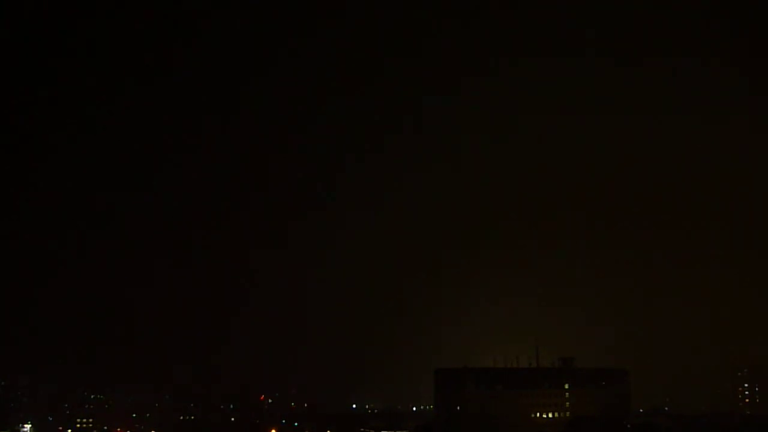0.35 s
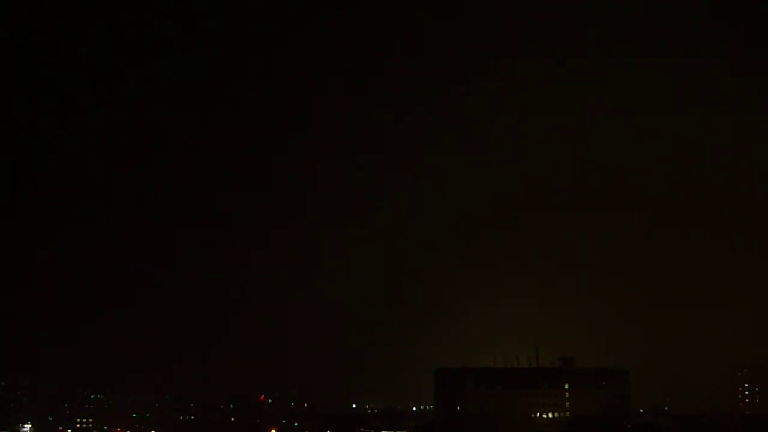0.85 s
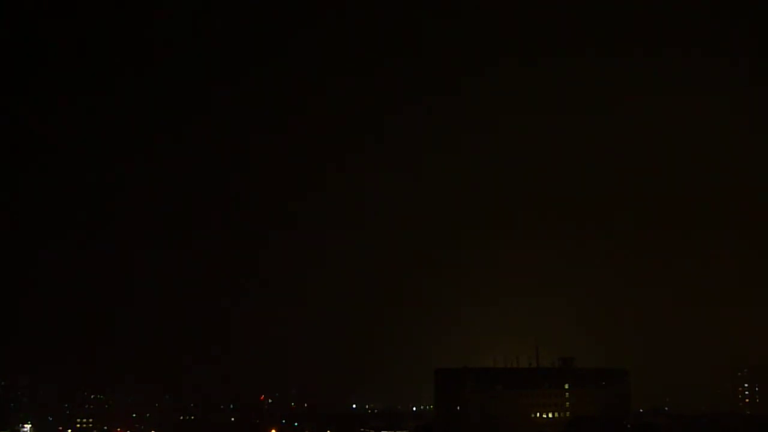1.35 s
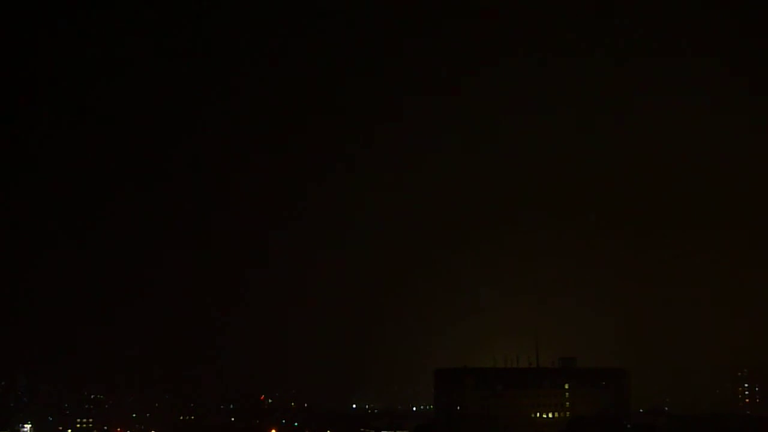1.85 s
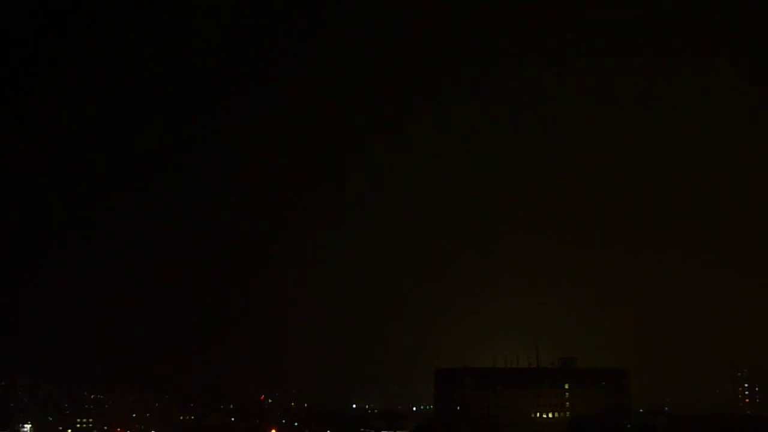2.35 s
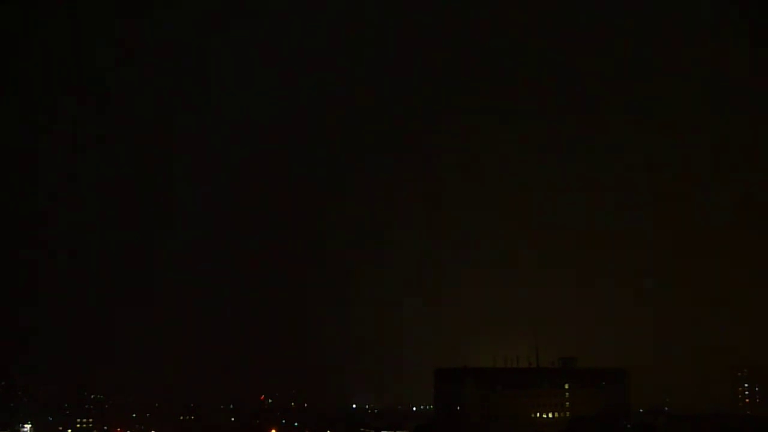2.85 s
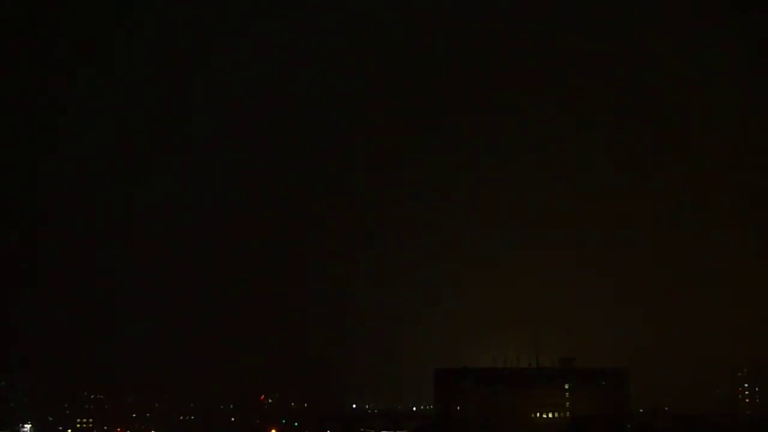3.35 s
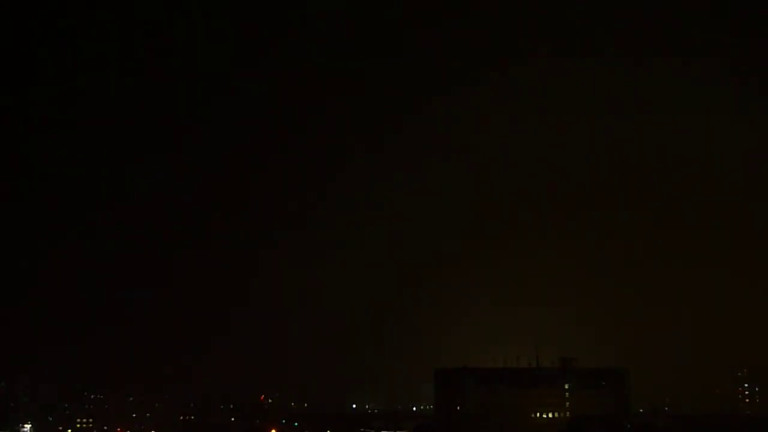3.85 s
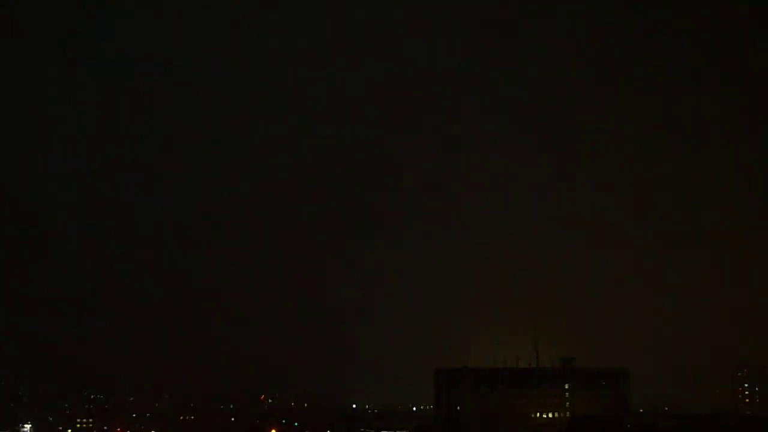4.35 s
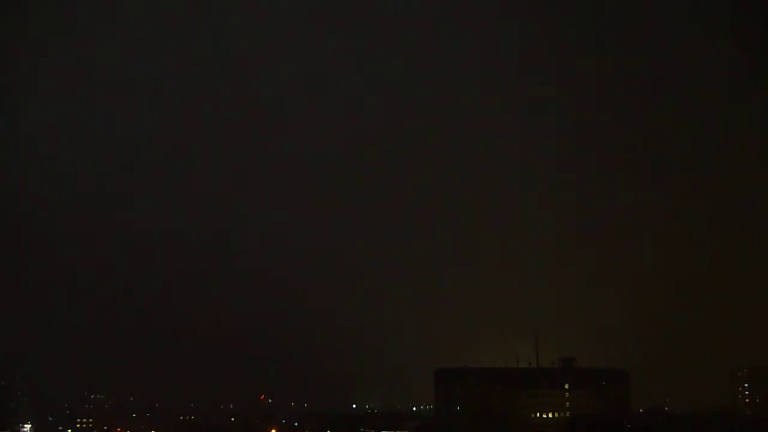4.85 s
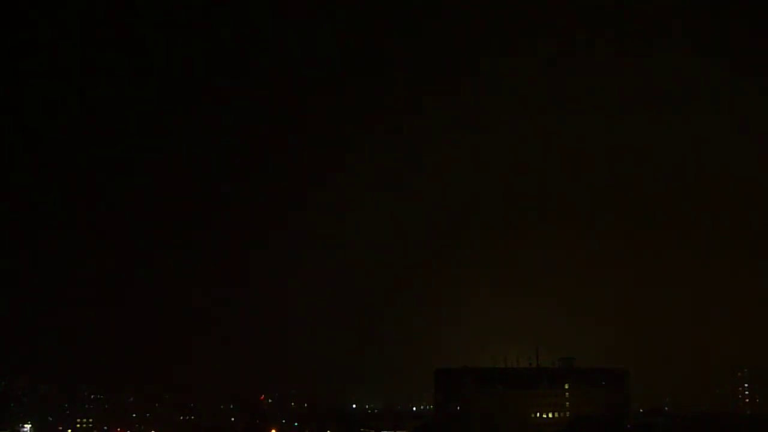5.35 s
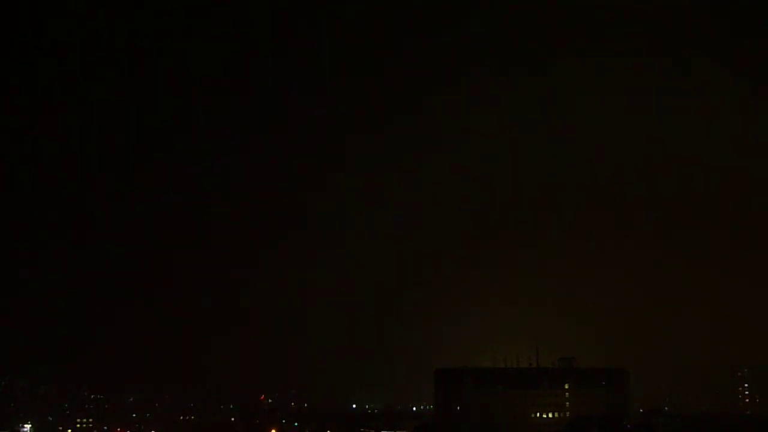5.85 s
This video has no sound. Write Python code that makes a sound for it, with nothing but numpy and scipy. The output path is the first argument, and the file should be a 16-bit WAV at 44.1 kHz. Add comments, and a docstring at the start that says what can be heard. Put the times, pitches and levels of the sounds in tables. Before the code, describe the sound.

Outdoors over a city at night, heard from a window by a small camera. Low thunder is already rolling at the start and never stops, surging and booming between walls with short, thudding claps. Steady, patchy rain hisses behind it, dipping quickly and swelling back. From half a second, close drops tap the sill. The sound is dull, slightly flattened at peaks, with faint hiss.

```python
"""Distant thunder rolls over a city at night in steady rain, heard by a small camera at a window.
From the start, scattered shocks rumble and boom between the walls, over deep city rumble and far raindrops.
The rain sinks quickly at set moments and swells back. After half a second the first close drops
tap the sill; soon after, single claps, each a sagging ring with a bright crack, stand out of the roll.
Throughout, the camera flattens the peaks, cuts the treble and adds faint hiss and whine."""
import sys
import numpy as np
from scipy import signal
from scipy.io import wavfile
from scipy.ndimage import uniform_filter1d

SR = 44100
rng = np.random.default_rng(int(sys.argv[2]) if len(sys.argv) > 2 else 0)


def how_loud(loudness_db):
    """Turn decibels into a plain amplitude multiplier (0 dB gives 1, 20 dB gives 10)."""
    steps = np.asarray(loudness_db, float) / 20
    return 10 ** steps


def dump_mix(stems):
    """Bounce the given channels to the path in sys.argv[1] as a 16-bit WAV at rate SR."""
    frames = np.atleast_2d(stems).T  # one column per channel
    limited = np.clip(frames, -1, 1)  # hard clip at full scale
    pcm = np.round(limited * 32767).astype(np.int16)
    wavfile.write(sys.argv[1], SR, pcm)


N = 262836  # length in samples

# Ringing tones of the sill. Each row: pitch in Hz (before detuning), relative level in dB (before tilt),
# time to fall by 60 dB in seconds.
SILL = [(1286, 1.5, 0.017), (1814, -2, 0.017), (2930, -5, 0.011), (3700, -7.5, .012), (4560, -14, 0.011)]
FAR_HZ = 260  # middle of the far thunder, where the brightness tilt pivots


def evened(x):
    """Scales a sound to an rms level of 1."""
    return x / np.sqrt(np.mean(x ** 2) + 1e-20)


def read(points, hz):
    """Reads a spectrum between its points, on a log-frequency axis."""
    point_hz, value = np.transpose(points)
    return np.interp(np.log(hz + 1), np.log(point_hz + 1), value)


def played(rows, column):
    """Turns a dB column of a table into gain over time; the first column is in seconds."""
    rows = np.array(rows)
    db = np.interp(np.arange(N) / SR, rows[:, 0], rows[:, column])
    return how_loud(db)


def add(mix, start_s, sound):
    """Mixes a sound in at a start time, cut off at the end of the mix."""
    part = mix[round(start_s * SR):][:len(sound)]
    part += sound[:len(part)]


def coloured(x, points, size=8192):
    """Filters a sound to a spectrum with no ringing ahead of it (minimum phase)."""
    hz = abs(np.fft.fftfreq(size, 1 / SR))
    log_gain = np.log(how_loud(np.maximum(read(points, hz), -100)))
    # The Hilbert transform finds the phase that puts the energy as early as possible.
    spectrum = np.exp(np.conj(signal.hilbert(log_gain)))
    taps = np.fft.ifft(spectrum).real[:size // 2]
    return signal.oaconvolve(x, taps)[:N]


def scattered(per_s, spread_db):
    """Makes random clicks of either sign; a few are large."""
    chance, size, sign = rng.random((3, N))
    happens = chance < per_s / SR
    height = how_loud(spread_db * np.minimum(-np.log(size + 1e-9), 5))
    return happens * np.sign(sign - .5) * height


def steadied(x, seconds, share):
    """Evens out a share (0 to 1) of the slow chance swell, so that the roll keeps to its course."""
    width = int(seconds * SR)
    power = uniform_filter1d(uniform_filter1d(x ** 2, width), width)
    level = np.sqrt(abs(power) + 1e-9)
    return evened(x / level ** share)


def surge(hz):
    """Gives the gain over time of short surges and lulls for a part of the roll centred on hz."""
    # Each row: middle in seconds, change in dB at its strongest, centre in Hz, width in octaves,
    # half length in seconds.
    surges = [(0.06, 11, 111, 0.35, 0.14), (0.353, -3, 165, 0.27, 0.022), (0.332, 7, 390, 0.26, 0.02),
              (0.447, 4, 150, 0.94, 0.039), (0.896, -5, 200, .8, 0.035), (1.236, 11, 112, 0.27, .04),
              (1.23, 7, 282, .4, .03), (1.288, -7, 180, .6, 0.034), (1.416, -1.5, 157, 0.28, 0.092),
              (1.514, 1.5, 112, .3, 0.058), (1.526, 4, 310, 0.61, 0.061), (1.658, 7.5, 202, 1.4, 0.027),
              (1.884, -2, 111, 0.33, 0.031), (2.092, 4, 260, 0.41, 0.084), (2.15, 12, 141, 0.48, 0.038),
              (2.423, 4, 112, 0.36, .04), (2.506, 4, 310, .5, .04), (2.554, 13, 112, 0.35, 0.067),
              (2.643, -6, 130, .5, 0.062), (2.74, 3, 200, 1.8, 0.094), (2.954, 0.5, 157, .3, .05),
              (3.25, 9, 130, .4, 0.058), (3.344, 1, 140, .4, .04), (3.388, -5, 200, 1.3, 0.028),
              (3.432, 6, 170, 0.37, .04), (3.496, -7, 230, 0.7, 0.032), (3.879, 7.5, 326, 0.39, 0.029),
              (3.91, 13, 129, .4, .04), (4.02, -6, 120, .4, .06), (4.2, 12, 112, 0.2, 0.064),
              (4.303, 4, 257, 0.24, 0.043), (4.55, -4.5, 150, 0.91, 0.051), (4.832, 6, 126, 0.45, .06),
              (4.945, 9.5, 112, .3, 0.033), (4.984, 7, 390, 0.28, 0.021), (5.051, 4, 262, 0.35, 0.019),
              (5.072, -13, 171, 1.3, 0.022), (5.206, -2.5, 200, 1.1, 0.084), (5.277, 11, 112, 0.22, .04),
              (5.45, 1, 112, 0.19, .05), (5.605, 5, 135, .4, 0.024), (5.61, 3, 392, .3, 0.028),
              (5.704, 5, 135, .5, 0.026), (5.923, 13, 170, 0.89, 0.035)]
    t = np.arange(0, N + 64, 64) / SR  # every 64 samples is fine enough
    db = np.zeros(len(t))
    for middle_s, change_db, mid_hz, octaves, half_s in surges:
        nearness = np.exp(-(np.log2(hz / mid_hz) / octaves) ** 2)
        db += change_db * nearness * np.maximum(1 - abs(t - middle_s) / half_s, 0)
    return how_loud(np.interp(np.arange(N) / SR, t, db))


def course(hz, db):
    """Gives the gain over time of a part of the roll: common level, tilted by brightness, with surges."""
    # Each row: time in seconds, common level in dB (before tilt, trim and surges),
    # brightness in dB per octave.
    roll = [(0.0, -28, 2.5), (0.85, -23.5, -0.5), (0.88, -29.5, 0), (1.48, -26, 2.5), (1.49, -23, -2),
            (2.47, -28, 0), (2.49, -25.5, 2), (2.77, -24.5, -1), (3.54, -27, 1), (3.88, -23, 2.5),
            (3.92, -28, 2.5), (4.3, -22.5, 2.5), (4.53, -28, -1), (4.86, -25, -1), (4.98, -22, 2.5),
            (5.13, -30.5, -1), (5.64, -26.5, -2.5), (5.88, -28, -4), (5.91, -26, 0), (5.96, -35.5, 7)]
    tilt = played(roll, column=2) ** np.log2(hz / FAR_HZ)
    return how_loud(db) * played(roll, column=1) * tilt * surge(hz)


def thunder():
    """Shocks from many bends of the channel arrive scattered, far ones dull; deep city rumble lies below."""
    # Spectra of the parts. Each row: frequency in Hz, relative level in dB per Hz.
    rumble_spectrum = [(50, -31), (80, -11), (95, -6.5), (115, 5.5), (135, -5), (170, -24.5), (300, -58.5)]
    boom_spectrum = [(80, -42.5), (125, -19), (145, -7.5), (157, -0.5), (168, -6), (195, -13), (300, -66.5)]  # lowest ring between the walls
    far_spectrum = [(120, -46), (180, -0.5), (210, -2.5), (250, 4), (280, 1.5), (301, 5), (330, -10.5),
                    (450, -53)]
    near_spectrum = [(220, -31), (320, -6.5), (368, 2), (400, -2), (500, -6.5), (700, -14), (900, -22.5),
                     (1400, -54)]
    deep_spectrum = [(12, -24), (25, -9), (35, -4), (60, -2), (75, 4.5), (90, -5), (130, -38)]  # deep rumble of the city, rising and falling in level
    # Levels of the ring and the city rumble. Each row: time in seconds, level in dB (the ring's before
    # trim and surges).
    boom_level = [(0.0, -25.5), (0.31, -32.5), (0.33, -23), (1.14, -23.5), (1.16, -27), (1.44, -19),
                  (1.48, -27.5), (1.59, -27.5), (2.95, -25), (2.99, -29.5), (4.37, -24.5), (4.75, -31),
                  (4.8, -28), (5.28, -31), (5.31, -21.5), (5.64, -29), (5.68, -23), (5.96, -27.5)]
    deep_level = [(0.0, -44), (0.06, -49), (0.76, -54), (0.78, -41.5), (0.93, -59), (1.59, -43.5),
                  (1.81, -51.5), (3.9, -52), (4.21, -41), (4.68, -52), (4.98, -38), (5.04, -49),
                  (5.51, -46), (5.58, -36.5), (5.86, -47), (5.96, -40)]

    shocks = scattered(1500., 1.74)  # the far and near parts share these
    rumble = coloured(scattered(1500., 0.91), rumble_spectrum)
    rumble = steadied(rumble, 0.029, 0.55) * course(hz=112, db=-8.5)
    boom = coloured(scattered(1500., 0.72), boom_spectrum)
    boom = steadied(boom, 0.084, 1.0) * played(boom_level, column=1) * how_loud(-1) * surge(hz=157)
    far = steadied(coloured(shocks, far_spectrum), 0.077, .7) * course(FAR_HZ, db=-1)
    near = steadied(coloured(shocks, near_spectrum), 0.036, 0.42) * course(hz=390, db=-5.5)
    deep = evened(coloured(rng.standard_normal(N), deep_spectrum)) * played(deep_level, column=1)
    return deep + rumble + boom + far + near


def sinking():
    """Gives the gain over time of the rain's dips: quick falls, slow returns."""
    # Each row: start in seconds, depth in dB (before the fall and return shape it).
    sinks = [(.33, 0), (.55, 4.5), (.72, 3.5), (.86, 7), (1.04, 2.5), (1.69, 6.5), (2.13, 4.5), (2.55, 2.),
             (3.2, 1), (3.32, 3.), (3.55, 1), (3.935, 5), (4.25, 4.5), (4.47, 6.5), (4.89, 3), (4.96, 8.5),
             (5.52, 0), (5.78, 1.5), (5.925, 7.5)]
    fall_s, swell_s = 0.014, 0.35
    drop_db = np.zeros(N)
    for start_s, depth_db in sinks:
        t = np.maximum(np.arange(N) / SR - start_s, 0)
        drop_db += depth_db * (1 - np.exp(-t / fall_s)) * np.exp(-t / swell_s)
    return how_loud(-drop_db)


def tap(tilt_db, detune, spray):
    """One drop rings the modes of the sill; its spray roughens and prolongs the ring."""
    t = np.arange(len(spray)) / SR
    ring = np.zeros(len(t))
    for (hz, db, t60), factor in zip(SILL, detune):
        octaves = np.log2(hz / SILL[0][0])
        ring += how_loud(db + tilt_db * octaves - 60 * t / t60) * np.sin(2 * np.pi * hz * factor * t)
    ring *= (1 - np.exp(-t / 0.00071)) ** 2  # soft start
    splash = spray * how_loud(-60 * t / 0.057)
    splash[0] = 2.6  # the first hit of the drop
    ring = signal.oaconvolve(ring, splash)
    return ring / abs(ring).max()


def rain():
    """Thousands of far drops blend to a patchy wash; light patter on the sill lies over it."""
    # Spectrum of the far drops. Each row: frequency in Hz, relative level in dB per Hz.
    wash_spectrum = [(300, -11.5), (500, 3), (800, 0), (1000, 0.5), (1300, 0), (1600, -2), (2000, -3.5),
                     (2600, -7.5), (3400, -10), (4000, -17.5), (4700, -23.5), (5500, -19), (7000, -38)]
    # Each row: time in seconds, level of the wash in dB (before the dips).
    rain_level = [(0, -33), (.3, -32.5), (1.5, -33.5), (2.95, -31.5), (3.16, -28.5), (4.2, -32.5),
                  (4.6, -35), (4.87, -32), (5.4, -33.5), (5.8, -31), (5.91, -29.5)]
    _, _, cells = signal.stft(coloured(scattered(9000., 1.3), wash_spectrum), SR, nperseg=512)
    # Random gains, smoothed over pitch and then time, make the wash patchy.
    patches = uniform_filter1d(rng.standard_normal(cells.shape), 20, 0)
    patches = evened(uniform_filter1d(patches, 8, 1))
    wash = evened(signal.istft(cells * how_loud(0.64 * patches), SR, nperseg=512)[1][:N])

    patter = np.zeros(N)
    for _ in range(8):  # eight different taps, each about 12 times a second
        hits = scattered(12., 4.0)
        one_tap = tap(0., rng.uniform(.85, 1.15, len(SILL)), rng.standard_normal(2000))
        patter += signal.oaconvolve(hits, one_tap)[:N]
    return (wash + how_loud(-13.5) * evened(patter)) * played(rain_level, column=1) * sinking()


def drops():
    """The few drops that land close each ring the sill, slightly detuned and with their own spray."""
    # Each row: start in seconds, peak in dB, treble tilt in dB per octave.
    near_drops = [(0.5013, -28, -0.5), (0.6094, -34, 6), (0.6454, -25.5, 1), (0.719, -26.5, -2.5),
                  (0.831, -25.5, -1), (0.9043, -29.5, -1.5), (2.4194, -26.5, 3), (2.9113, -28, -1),
                  (3.0935, -25, 3), (3.155, -22, -1), (4.2407, -24.5, 2), (4.8692, -30, 2),
                  (4.935, -25.5, -5), (5.4016, -30, -2), (5.531, -24.5, -1), (5.901, -25, -2.5)]
    out = np.zeros(N)
    for start_s, peak_db, tilt_db in near_drops:
        detune = rng.uniform(0.937, 1.08, len(SILL))
        spray = rng.standard_normal(2000)
        add(out, start_s, how_loud(peak_db) * tap(tilt_db, detune, spray))
    return out


def claps():
    """Each clap is a quick push that rings a few cycles and sags in pitch, with a short bright crack."""
    # Each row: start in seconds, body level in dB, pitch it settles to in Hz,
    # time for the body to fall by 60 dB in seconds, crack level in dB (levels before rise and decay).
    single_claps = [(.78, -12, 200, .08, -36), (0.83, -12, 258, 0.094, -31.5), (.853, -8, 157.4, 0.15, -33),
                    (1.011, -10, 160, 0.22, -37), (1.12, -10, 156, .12, -41), (1.228, -17, 158, .1, -34),
                    (1.495, -14, 248, 0.11, -22.5), (1.771, -10, 153, 0.041, -35),
                    (1.873, -7.5, 164, 0.05, -35), (1.923, -18, 283, 0.039, -36),
                    (2.087, -16, 307, 0.085, -26), (2.498, -10, 273, 0.041, -29),
                    (2.878, -13, 207, 0.037, -24), (3.607, -23, 372, 0.094, -25),
                    (4.114, -13, 150, 0.07, -24), (4.944, -10, 261, 0.095, -27),
                    (4.974, -8, 157.5, 0.074, -16), (5.012, -6, 124, 0.041, -25),
                    (5.305, -9.5, 157.7, 0.19, -38), (5.368, -11, 156, 0.1, -38),
                    (5.635, -16, 295, 0.031, -37)]
    crack_hz, crack_t60 = 704, 0.035  # Hz, seconds to fall by 60 dB
    out, t = np.zeros(N), np.arange(SR // 4) / SR
    for start_s, body_db, hz, t60, crack_db in single_claps:
        turns = hz * (t + .3 * 0.0058 * (1 - np.exp(-t / 0.0039)))  # cycles so far: starts sharp
        body = how_loud(body_db - 60 * t / t60) * (1 - np.exp(-t / 0.0028)) * np.sin(2 * np.pi * turns)
        crack = how_loud(crack_db - 60 * t / crack_t60) * (1 - np.exp(-t / .0005))
        crack = crack * np.sin(2 * np.pi * crack_hz * t)
        add(out, start_s, body + crack)
    return out


def scene():
    """Mixes thunder with city rumble, rain, close drops and claps into one channel."""
    return (thunder() + rain() + drops() + claps())[None]


def band_limit(x):
    """A steep low-pass at the top of the band."""
    return signal.sosfilt(signal.butter(12, 8850, fs=SR, output="sos"), x)


def record(dry):
    """Peaks flatten at a knee, the treble rolls off, then circuit hiss, whine and a small offset."""
    # Spectrum of the circuit hiss. Each row: frequency in Hz, relative level in dB per Hz.
    hiss_spectrum = [(20, 11), (5500, -2.5), (7000, -2.5), (7600, -4), (8200, -11.5), (8800, -26.5),
                     (9500, -54)]
    # Faint steady tones. Each row: frequency in Hz, rms level in dB.
    whine_tones = [(6222, -92), (6666, -92)]
    ceiling, hardness = .285, 8.  # highest level of the flattened peaks, sharpness of the knee
    dull = signal.sosfilt(signal.butter(6, 4400., fs=SR, output="sos"), dry)
    clipped = dull / (1 + abs(dull / ceiling) ** hardness) ** (1 / hardness)
    smooth = signal.sosfilt(signal.butter(4, 4400., fs=SR, output="sos"), clipped)
    t = np.arange(N) / SR
    whine = sum(how_loud(db) * np.sqrt(2) * np.sin(2 * np.pi * hz * t) for hz, db in whine_tones)
    hiss = how_loud(-64.5) * evened(coloured(rng.standard_normal(N), hiss_spectrum))
    offset = -.0055  # constant shift of the whole wave
    return band_limit(smooth + hiss + whine + offset)


dry = scene()
out = record(dry)
dump_mix(out)
```